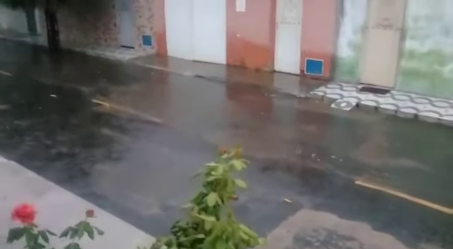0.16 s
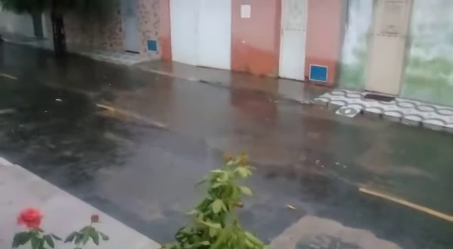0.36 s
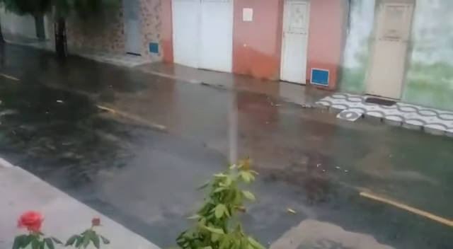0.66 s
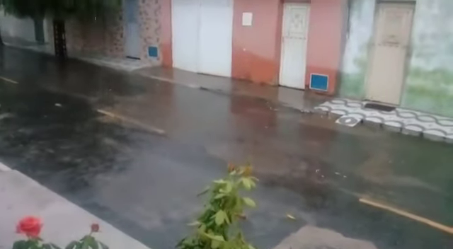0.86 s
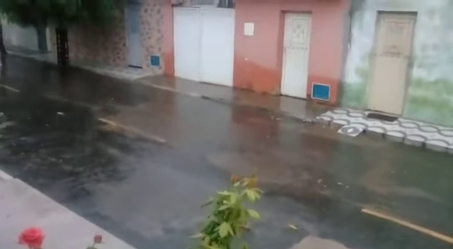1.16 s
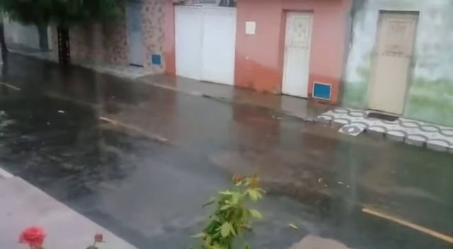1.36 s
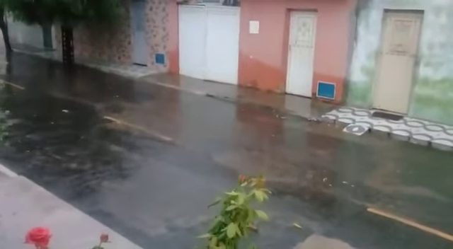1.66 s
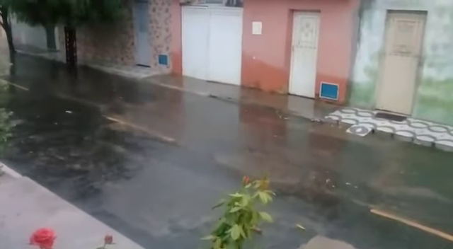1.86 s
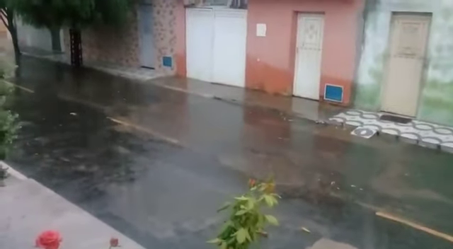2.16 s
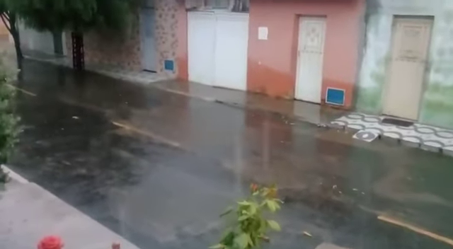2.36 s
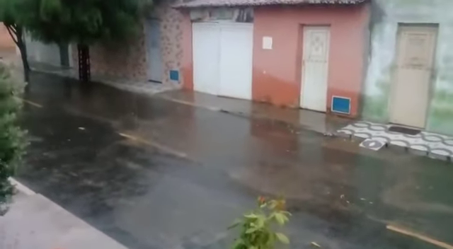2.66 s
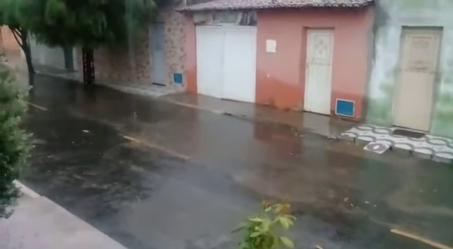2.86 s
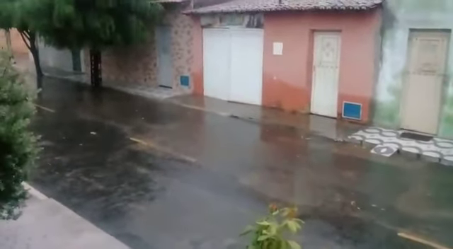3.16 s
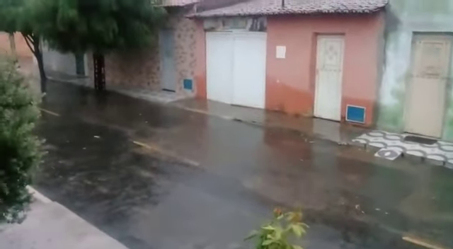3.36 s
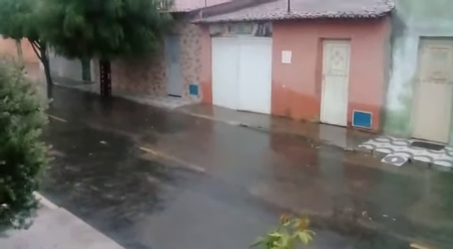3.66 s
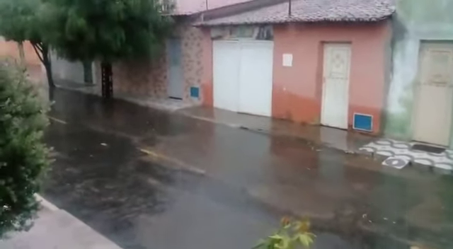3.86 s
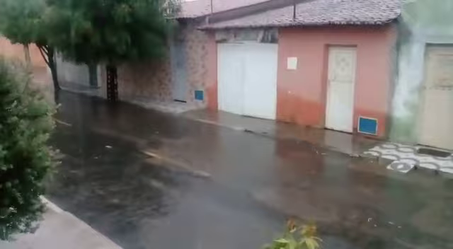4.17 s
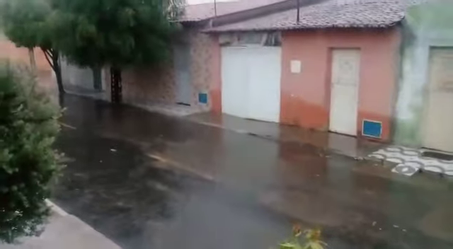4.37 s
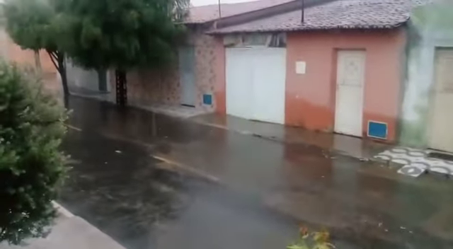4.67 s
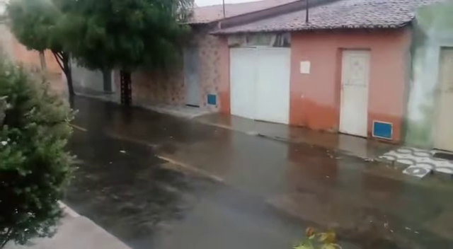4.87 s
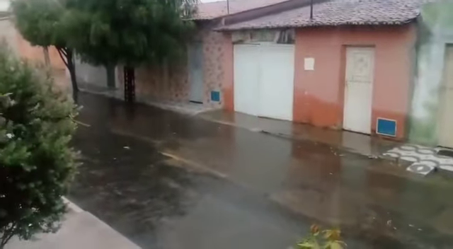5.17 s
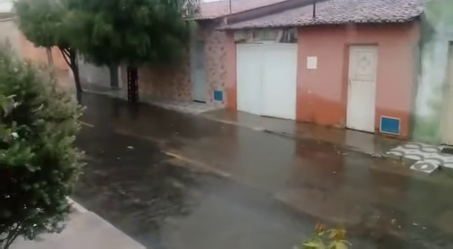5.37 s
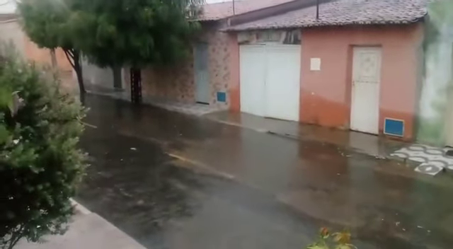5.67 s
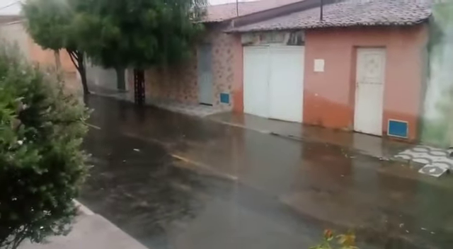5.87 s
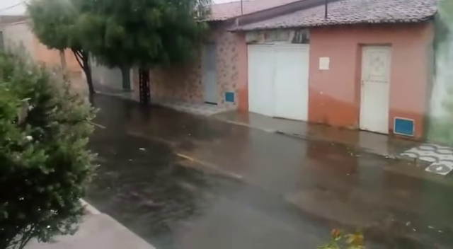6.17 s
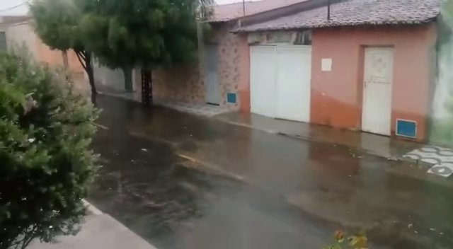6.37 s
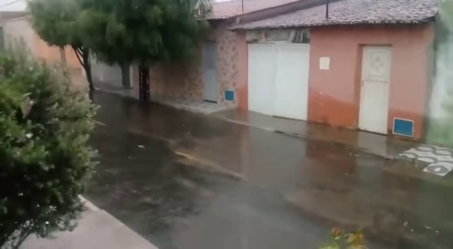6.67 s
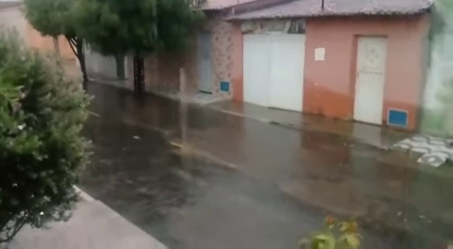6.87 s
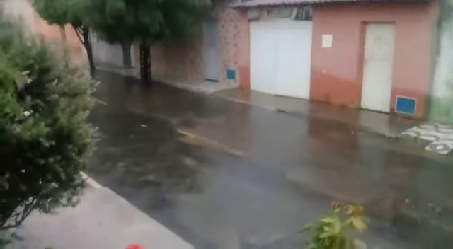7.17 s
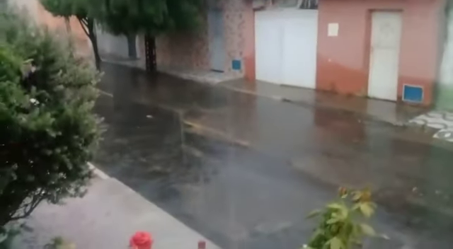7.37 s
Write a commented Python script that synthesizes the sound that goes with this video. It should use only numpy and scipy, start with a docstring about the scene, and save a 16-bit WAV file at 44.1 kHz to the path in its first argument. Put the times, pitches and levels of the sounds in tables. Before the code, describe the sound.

A hand-held camera outdoors hears gentle continuous rain on paving and leaves. Plump, mid-pitched drips land near the microphone, scattered at first, sparser in the middle and thick toward the end, with bright tiny ticks and plips between them. House fronts return short echoes. Far rain drums dully and a faint town hum slowly fades. Muffled thumps and rumble from the gripping hand come at the start, near four seconds and most strongly at five.

```python
"""Light rain on a wet paved street

Fat drips smack down close by as short tone bursts, and the house fronts echo them. Smaller drops patter,
plip and tick: showers of such bursts over shaped noise. Filtered noise also makes the dull far rain and the
faint hum of the town. The hand bumps the camera as it turns: low bursts over a swelling rumble."""
import sys
import numpy as np
from scipy import signal
from scipy.fft import rfft, irfft, next_fast_len
from scipy.io import wavfile
from scipy.ndimage import map_coordinates

SR = 44100
rng = np.random.default_rng(int(sys.argv[2]) if len(sys.argv) > 2 else 0)


def transcribe(signal):
    """Save signal, clipped to [-1, 1], as a 16-bit WAV file at the path in sys.argv[1]."""
    frames = np.atleast_2d(signal).T
    limited = np.clip(frames, -1, 1)
    pcm = np.round(limited * 32767).astype(np.int16)
    wavfile.write(sys.argv[1], SR, pcm)


N = 331632  # length in samples


def amp(db):
    """Level: amplitude gain is ten to the power of decibels over twenty."""
    return 10 ** (np.asarray(db) / 20)


def unit(x):
    """Normalization: x scaled to an rms of 1."""
    return x / np.sqrt(np.mean(x ** 2) + 1e-20)


def curves(rows):
    """Linear interpolation: one value per sample for each column after the time."""
    s, *columns = np.transpose(rows)
    now = np.arange(N) / SR
    return [np.interp(now, s, column) for column in columns]


def wobble(rate):
    """Slow random modulation: a smooth curve through random knots, rate of them a second."""
    knots = rng.standard_normal(int(N * rate / SR) + 4)
    return map_coordinates(knots, [np.arange(N) * rate / SR])


def coloured(x, points):
    """Minimum-phase filtering: folding the cepstrum makes the gain of the (Hz, dB) points causal."""
    size = 2 * next_fast_len(len(x) // 2 + 4096)
    hz, db = np.transpose(points)
    bins_hz = np.fft.rfftfreq(size, 1 / SR)
    gain = amp(np.interp(np.log(bins_hz + 1), np.log(hz), db))
    cepstrum = irfft(np.log(gain))[:size // 2]
    cepstrum[1:] *= 2
    response = np.exp(rfft(cepstrum, size))
    return irfft(rfft(x, size) * response)[:len(x)]


def noise(points):
    """Spectral shaping: white noise filtered to a given spectrum, rms 1."""
    return unit(coloured(rng.standard_normal(N), points))


def add(track, s, sound):
    """Superposition: the sound is summed into the track from time s."""
    part = track[max(round(s * SR), 0):][:len(sound)]
    part += sound[:len(part)]


def smack(t, hz, cycles, phase):
    """Damped impulse: a tone burst whose envelope swells fast, peaks at t = 0 and dies more slowly."""
    width = cycles / hz * np.where(t < 0, .68, .95)
    envelope = np.exp(-(t / width) ** 2)
    return envelope * np.cos(2 * np.pi * hz * t + phase)


def scattered(rate, db, spread_db, hz, octaves):
    """Random arrivals: rows (s, dB, Hz) at rate a second, spread evenly either side of db and hz."""
    when, size, pitch = rng.random((round(rate * N / SR), 3)).T
    level_db = db + spread_db * (2 * size - 1)
    pitch_hz = hz * 2 ** (octaves * (2 * pitch - 1))
    return np.transpose([when * N / SR, level_db, pitch_hz])


# Reflections from the house fronts, before colouring and random variation
# columns: delay_s, level_db
WALL_ECHOES = [(.0025, -14.5), (.009, -21), (.014, -14.5), (0.031, -15.5), (.038, -15.5), (.052, -14.5),
               (.059, -20)]
# Spectral gain of the street's echo; columns: frequency_hz, gain_db
WALL_COLOUR = [(200, -17), (1000, -8.5), (1500, 0), (2000, 2), (2800, 2), (4500, 3.5), (7000, -9),
               (15000, -4)]


def street_echo(wall_db, smear_s, tail_db, t60):
    """Reflection and reverberation: each wall returns a sharp copy and scatter over a decaying diffuse tail."""
    t = np.arange(SR // 3) / SR
    answer = rng.standard_normal(len(t)) * amp(-60 * t / t60)
    answer *= amp(tail_db) / np.linalg.norm(answer)
    for delay, db in WALL_ECHOES:
        patch = rng.standard_normal(len(t)) * np.exp(-t / smear_s)
        patch *= .6 / np.linalg.norm(patch)
        patch[0] += .8  # the sharp copy
        # every drop lands somewhere else, so its echoes differ in delay and strength
        echo_s = delay * rng.uniform(.94, 1.06)
        echo_db = db + wall_db + rng.normal(0, 2)
        add(answer, echo_s, amp(echo_db) * patch)
    return coloured(answer, WALL_COLOUR)


def shower(rate, hz, spread, cycles, range_db):
    """Spherical spreading: random drops, even over the ground, weaken as 1 / distance; rms 1."""
    chance = rng.random((int(rate * N / SR), 5))
    when, area, phase = chance[:, :1], chance[:, 1:2], 2 * np.pi * chance[:, 2:3]
    pitch = hz * np.exp(spread * (chance[:, 3:4] - chance[:, 4:]))
    # area grows as distance squared; the nearest drop is about range_db above the farthest
    size = 1 / np.sqrt(area + amp(-range_db) ** 2)
    reach = int(np.pi * SR * cycles / hz)
    k = np.arange(-reach, reach)
    drops = size * smack(k / SR, pitch, cycles, phase)
    places = (when * N).astype(int) + k
    return unit(np.bincount(places.ravel() % N, drops.ravel(), N))


# Spectrum of the town's hum; columns: frequency_hz, relative_level_db (per Hz)
TOWN_SPECTRUM = [(30, -27), (70, -15), (115, -0.5), (160, -2.5), (230, -5), (310, -11.5), (500, -17.5),
                 (1200, -53)]


def town_hum():
    """Many unresolved sources: the distant town merges into low-frequency noise, rms 1."""
    return noise(TOWN_SPECTRUM)


# Spectrum of the rain down the street; columns: frequency_hz, relative_level_db (per Hz)
FAR_RAIN_SPECTRUM = [(150, -36), (330, -5), (480, -5.5), (620, 0), (780, 2), (1050, -2), (1600, -9.5),
                     (4000, -40.5)]


def far_rain():
    """Random superposition: dull drumming on roofs and trees, low bursts over shaped noise."""
    drumming = shower(rate=200, hz=894, spread=0.37, cycles=1.15, range_db=9.0)
    return amp(-0.5) * noise(FAR_RAIN_SPECTRUM) + amp(-10.5) * drumming


# Spectrum of the mist's hiss; columns: frequency_hz, relative_level_db
SPRAY_SPECTRUM = [(700, -25), (2000, -15), (3500, -3.5), (5600, 7.5), (7200, -1.5), (8800, -5.5),
                  (11000, -1.5), (14000, -1.5), (16000, -10.5)]


def spray(rate, life_s, range_db):
    """Exponential energy decay: drops burst into mist, puffs of hiss whose power fades over life_s; rms 1."""
    when, area = rng.random((int(rate * N / SR), 2)).T
    power = np.bincount((when * N).astype(int), 1 / (area + amp(-range_db) ** 2), N)
    t = np.arange(SR // 20) / SR
    puffs = signal.fftconvolve(power, np.exp(-t / life_s))[:N]
    hiss = np.sqrt(abs(puffs)) * rng.standard_normal(N)
    return unit(coloured(hiss, SPRAY_SPECTRUM))


# Spectrum of the wash of the wet street; columns: frequency_hz, relative_level_db (per Hz)
WET_STREET_SPECTRUM = [(300, -34), (900, -8.5), (1350, -2.5), (1850, 0), (2300, -1.5), (2900, -4),
                       (4000, -7.5), (5500, -9), (7000, -17), (8700, -17.5), (10500, -15.5), (13300, -15),
                       (15800, -26.5)]
# Spectral gain on the crisp splats; columns: frequency_hz, gain_db
SPLAT_COLOUR = [(1500, -13.5), (3000, 4), (5600, -3), (7000, 12), (12000, 0)]


def patter():
    """Random superposition: plops on wet paving, crisp ticks on leaves, mist, and the wash they merge into."""
    plops = shower(rate=140, hz=1900, spread=.35, cycles=1.5, range_db=14)
    echo = street_echo(wall_db=-7.0, smear_s=.002, tail_db=-5.5, t60=0.36)
    plops = unit(plops + signal.fftconvolve(plops, echo)[:N])
    splats = shower(rate=380, hz=3600, spread=.55, cycles=2, range_db=17)
    splats = unit(coloured(splats, SPLAT_COLOUR))
    specks = shower(rate=600, hz=12000, spread=.28, cycles=1.4, range_db=19)
    mist = spray(rate=110, life_s=0.0013, range_db=18.5)
    flurry = amp(.9 * wobble(28))  # drops come in flurries
    wash = amp(.7 * wobble(30)) * noise(WET_STREET_SPECTRUM)
    drops = amp(-6.5) * plops + amp(-9.0) * splats + amp(-16.5) * specks
    return flurry * drops + amp(-11) * mist + amp(-3.0) * wash


# Bumps of the hand on the camera body; columns: peak_s (of the envelope), level_db (of the thump)
BUMPS = [(0.139, -23.5), (0.157, -28), (3.533, -29), (3.557, -27), (3.725, -22.5), (3.912, -25),
         (3.958, -32), (4.973, -20), (4.999, -23), (5.013, -23), (5.041, -14.5), (5.177, -20),
         (5.553, -26.5), (5.624, -26), (6.074, -22.5), (7.321, -29)]
# Shifts of the hand's grip, before the random unevenness
# columns: start_s (of full level), length_s (at full level), level_db (of the rumble)
GRIP_SHIFTS = [(0.0, 0.24, -47), (1.2, 0.17, -55), (3.15, 0.24, -49), (3.38, 0.53, -47.5),
               (4.83, .35, -42.5), (5.35, 0.47, -52), (6.85, 0.58, -57)]
GRIP_ATTACK_S, GRIP_RELEASE_S = .04, 0.074
GRIP_REST_DB = -66  # rumble of the hand held still, before the unevenness
BUMP_HZ, BUMP_AT_DB, BUMP_OCTAVES_PER_DB = 107.4, -23.5, 0.07  # harder bumps are higher in pitch
BUMP_CYCLES = 0.68
KNOCK_HZ, KNOCK_DB = 294, -12.5  # the hardest bump also knocks the case; softer ones hardly do


def handling():
    """Structure-borne sound: the shifting grip rumbles unevenly, and bumps thump and knock the camera body."""
    now = np.arange(N) / SR
    grip = amp(GRIP_REST_DB)
    for s, length, db in GRIP_SHIFTS:
        attack = np.clip((now - s) / GRIP_ATTACK_S + 1, 0, 1)
        release = np.exp(-np.maximum(now - s - length, 0) / GRIP_RELEASE_S)
        grip = grip + amp(db) * attack * release
    unevenness = amp(3.0 * wobble(14))
    rumble = noise([(12, -46), (35, -8), (70, 1.5), (130, -5.5), (250, -18.5), (700, -59)])
    track = grip * unevenness * rumble
    t = np.arange(SR // 12) / SR - .02
    hardest_db = max(db for s, db in BUMPS)
    for s, db in BUMPS:
        hz = BUMP_HZ * 2 ** (BUMP_OCTAVES_PER_DB * (db - BUMP_AT_DB))
        thump = smack(t, hz, BUMP_CYCLES, np.pi * rng.uniform(.4, .8))
        knock_gain = amp(KNOCK_DB + db - hardest_db)
        knock = knock_gain * smack(t + .004, KNOCK_HZ, BUMP_CYCLES, np.pi / 2)
        add(track, s + t[0], amp(db) * (thump + knock))
    return track


# Sharpest ticks of small drops on hard things nearby
# columns: start_s, level_db (before a 3 dB lift), pitch_hz
SHARP_TICKS = [(0.1191, -18, 12300), (0.7597, -16.5, 6370), (1.261, -23, 6610), (1.665, -10.5, 13900),
               (1.938, -12.5, 13500), (2.242, -15.5, 11900), (3.398, -16, 6160), (3.697, -19, 6200),
               (5.088, -16, 6010), (5.46, -15.5, 6000), (7.422, -11, 5800)]


def ticks():
    """Impact excitation: small drops snap on hard surfaces and throw a short fizz of spray."""
    track = np.zeros(N)
    t = np.arange(SR // 30) / SR - .0012
    lesser = scattered(rate=1.8, db=-22, spread_db=0.5, hz=10500, octaves=1)
    for s, db, hz in [*SHARP_TICKS, *lesser]:
        snap = smack(t, hz, 0.53, rng.uniform(0, 2 * np.pi))
        burst = amp(-9) * np.exp(-abs(t) / .0006)
        trail = amp(-18) * (t > 0) * np.exp(-abs(t) / .005)
        hiss = (burst + trail) * rng.standard_normal(len(t))
        fizz = coloured(hiss, [(hz / 4, -20), (hz, 0), (hz * 2, -3)])
        add(track, s, amp(db + 3) * (snap + fizz))
    return track


# Fattest drips close by
# columns: start_s, level_db (before a 1 dB cut), pitch_hz, splash_db (against the smack, before an 8 dB lift)
FAT_DRIPS = [(0.3527, -14.5, 1660, -11), (0.4364, -3, 1790, -20), (0.4679, -10, 1970, -13),
             (0.4897, -11, 1920, -10), (0.5725, -13.5, 1430, -12), (0.8013, -10, 1780, -15),
             (0.8854, -9, 1970, -15), (1.057, -11, 1950, -8), (1.2244, -11, 1760, -27),
             (1.2497, -11.5, 1930, -22), (1.5196, -9, 2400, -8), (1.5222, -9.5, 2000, -14),
             (2.0065, -2.5, 1970, -14), (2.165, -9, 2030, -19), (2.3042, -13, 2100, -13),
             (2.3938, -10, 1620, -17), (2.5431, -11.5, 1700, -32), (2.7385, -13.5, 1730, -19),
             (3.0471, -11.5, 1960, -20), (3.0762, -10.5, 2060, -11), (3.5396, -7.5, 1490, -24),
             (3.8184, -6.5, 1810, -19), (4.2383, -14, 1990, -27), (4.356, -14, 1920, -19),
             (4.4085, -15, 1680, -25), (5.1813, -11, 1820, -17), (5.2003, -10, 1700, -20),
             (5.582, -13, 1980, -20), (5.9, -13, 1700, -29), (6.0388, -1.5, 1920, -20),
             (6.089, -8.5, 1920, -30), (6.2747, -15, 1690, -12), (6.369, -8.5, 1620, -30),
             (6.5368, -14, 1550, -9), (6.5911, -14.5, 1800, -19), (6.788, -8.5, 1930, -16),
             (6.8522, -4.5, 1640, -25), (6.909, -14, 2060, -13), (6.997, -11, 1780, -30),
             (7.0444, -13, 1830, -20), (7.0836, -10.5, 1950, -19), (7.2003, -12.5, 2110, -13),
             (7.3696, -10.5, 1540, -33)]
LESSER_SPLASH_DB = -13  # splash_db of the lesser drips
# a drip on bare paving splashes and stops short; one in a puddle splashes less and rings longer
PAVING_CYCLES, CYCLES_PER_DB = .82, .016
SPLASH_HZ, SPLASH_OCTAVES = 4580, 0.33  # middling splash pitch, and about how far it varies either way
NEAREST_DB, ECHO_DB, WETTER_DB_PER_DB = -2, -2, .03  # a weaker drip lands farther off and keeps more echo


def drips():
    """Impact and reflection: a fat drip gives a low smack and a brief bright splash, echoed by the street."""
    track = np.zeros(N)
    t = np.arange(SR // 100) / SR - .002
    random_drips = scattered(rate=5, db=-16.5, spread_db=1.3, hz=1970, octaves=.22)
    lesser = [(*drip, LESSER_SPLASH_DB) for drip in random_drips]
    for s, db, hz, splash_db in [*FAT_DRIPS, *lesser]:
        phase, splash_phase = rng.uniform(0, 2 * np.pi, 2)
        # the pitch climbs through the smack as the drop flattens into a film
        climb = .35 * (t * hz) ** 2 * np.exp(-(t * hz / 3) ** 2)
        cycles = PAVING_CYCLES - CYCLES_PER_DB * splash_db
        low_smack = smack(t, hz, cycles, phase + climb)
        splash_hz = SPLASH_HZ * 2 ** (SPLASH_OCTAVES * rng.uniform(-1.04, 1))
        splash = smack(t - .0003, splash_hz, 1.35, splash_phase)
        drop = low_smack + amp(splash_db + 8.0) * splash
        street = street_echo(wall_db=0.0, smear_s=0.0028, tail_db=-8.5, t60=0.18)
        echo = signal.fftconvolve(drop, street)
        echo_db = db + ECHO_DB + WETTER_DB_PER_DB * (NEAREST_DB - db)
        add(track, s - .0008, amp(db - 1) * drop)
        add(track, s, amp(echo_db) * echo)
    return track


# Clearest plips of small drops on wet things nearby
# columns: peak_s (of the envelope), level_db (before a 1 dB cut), pitch_hz
CLEAR_PLIPS = [(1.058, -16, 5340), (1.6, -16.5, 3700), (2.166, -11, 3460), (2.945, -17, 5050),
               (5.427, -11.5, 6030), (5.552, -16, 6500), (6.126, -18.5, 6600), (7.267, -15, 5960)]


def plips():
    """Damped resonance: a small drop rings for a few cycles, and the walls give a little of it back."""
    track = np.zeros(N)
    t = np.arange(SR // 100) / SR - .001
    lesser = scattered(rate=1, db=-21.5, spread_db=7, hz=5200, octaves=0.54)
    for s, db, hz in [*CLEAR_PLIPS, *lesser]:
        ring = amp(db - 1) * smack(t, hz, 2.06, rng.uniform(0, 2 * np.pi))
        street = street_echo(wall_db=-13, smear_s=.002, tail_db=-5.0, t60=0.061)
        add(track, s + t[0], ring)
        add(track, s + t[0], signal.fftconvolve(ring, street))
    return track


# Levels of the far sounds, which fade as the camera turns away
# columns: time_s, town_hum_db, far_rain_db
DISTANT_LEVELS = [(0.0, -44, -40.5), (2.2, -45.5, -42), (4.4, -47.5, -45), (7.52, -50, -45.3)]
NEAR_RAIN_DB = -33.5  # gain of the patter, steady throughout


def scene():
    """Superposition: rain near and far, the hum of the town and the handling sum linearly."""
    town_db, far_db = curves(DISTANT_LEVELS)
    rain = amp(NEAR_RAIN_DB) * patter() + amp(far_db) * far_rain()
    rain = rain + drips() + plips() + ticks()
    return (rain + amp(town_db) * town_hum() + handling())[None]


TOP_HZ = 15950


def record(dry):
    """Band limitation: the camera keeps nothing from TOP_HZ up."""
    size = next_fast_len(N + SR // 2)
    passed = np.fft.rfftfreq(size, 1 / SR) < TOP_HZ
    return irfft(rfft(dry, size) * passed, size)[:, :N]


dry = scene()
out = record(dry)
transcribe(out)
```